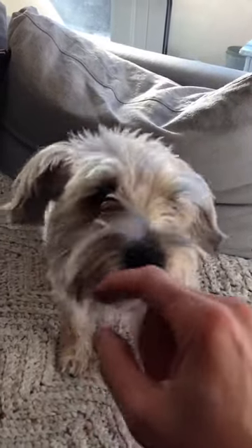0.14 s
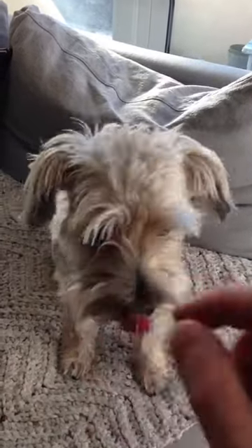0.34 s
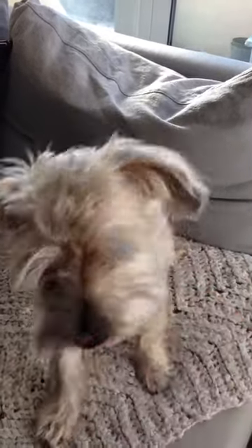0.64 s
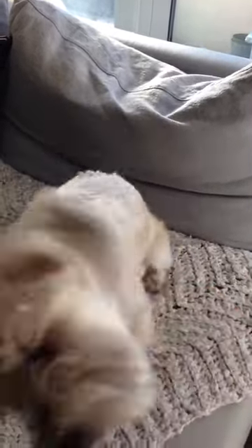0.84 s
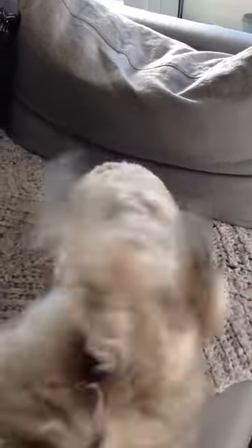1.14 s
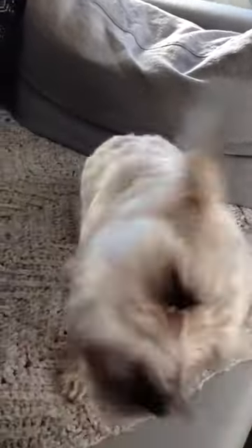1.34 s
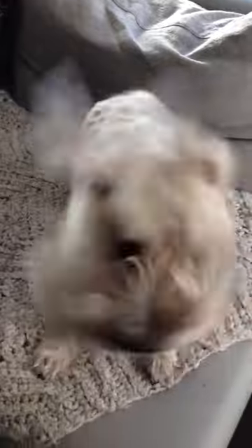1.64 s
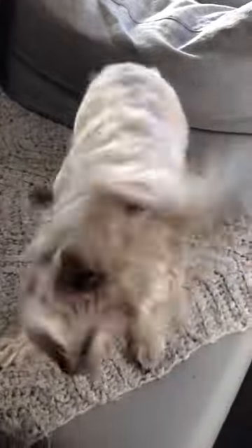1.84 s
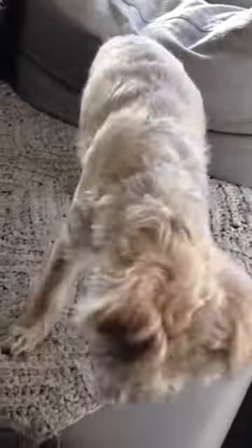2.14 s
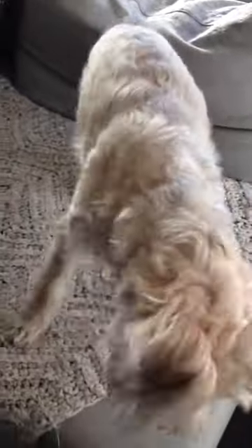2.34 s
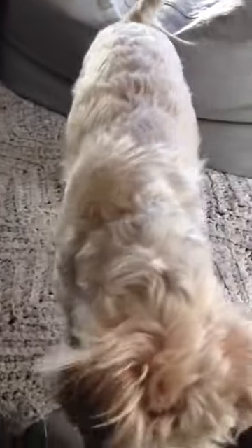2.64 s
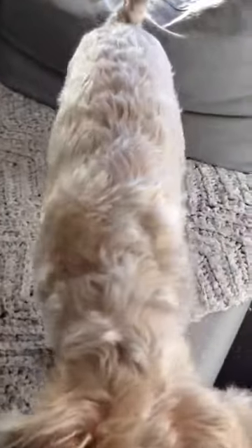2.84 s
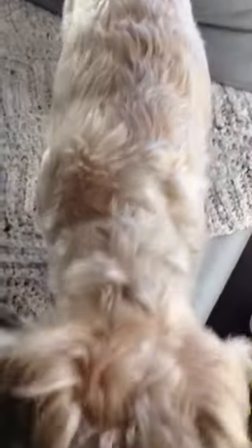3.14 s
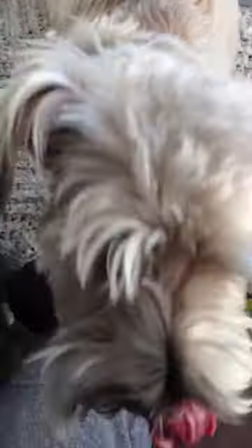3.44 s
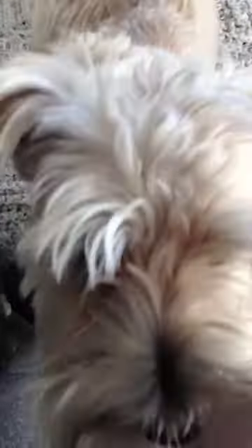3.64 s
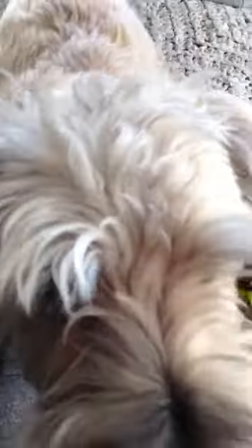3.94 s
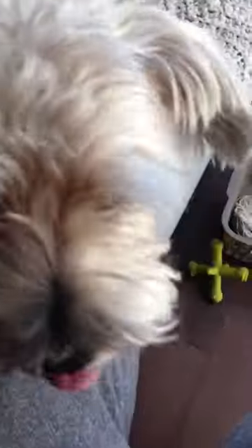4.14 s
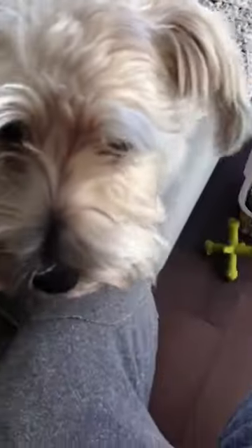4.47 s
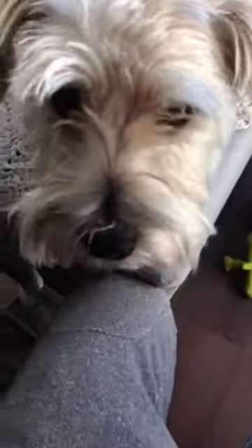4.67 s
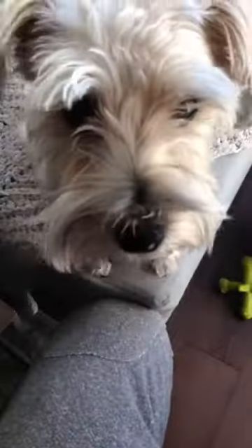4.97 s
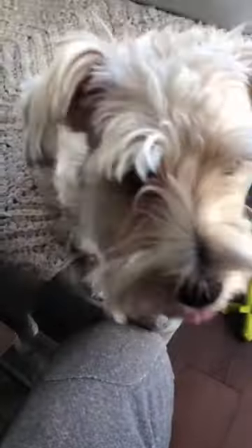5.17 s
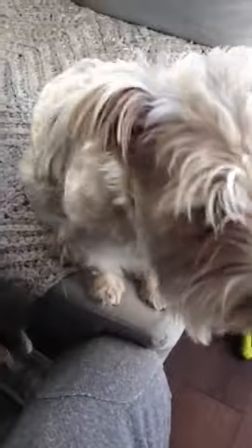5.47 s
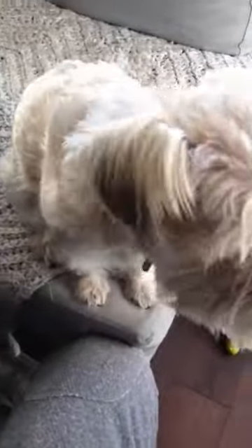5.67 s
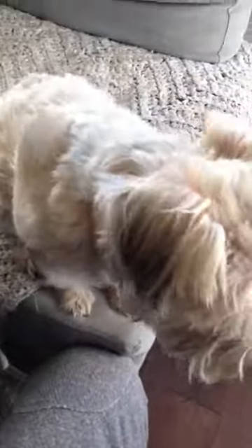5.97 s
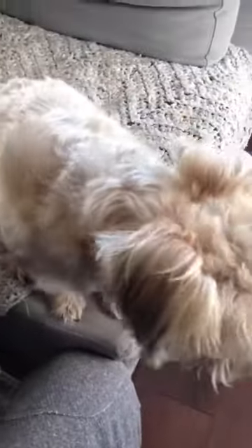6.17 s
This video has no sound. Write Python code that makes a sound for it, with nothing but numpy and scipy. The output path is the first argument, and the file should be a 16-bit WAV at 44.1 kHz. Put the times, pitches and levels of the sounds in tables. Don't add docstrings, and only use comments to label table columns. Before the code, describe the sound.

Close, dry indoor sound from one small microphone about a metre from a dog. Light claw taps lead into a one-second head shake with accelerating leathery ear flaps, rustling fur and hard, high clinks of collar tags with a thin metallic rattle. A few fading jingles follow, then soft fur rustle, wet licks and ticking claws. Finally two tiny airy squeaks, one sinking, one rising and tearing, then near silence.

```python
import sys
import numpy as np
from scipy import signal
from scipy.fft import rfft, irfft, next_fast_len
from scipy.io import wavfile
from scipy.ndimage import map_coordinates

SR = 44100
rng = np.random.default_rng(int(sys.argv[2]) if len(sys.argv) > 2 else 0)


def unload_audio(sound):
    columns = np.transpose(np.atleast_2d(sound))
    steps = np.round(np.clip(columns, -1, 1) * 32767)
    wavfile.write(sys.argv[1], SR, steps.astype(np.int16))


def boost(x):
    u = np.asarray(x, float) / 20
    return 10 ** u


N = 278271

# f/Hz, density/dB
FLOOR_SPECTRUM = [(15, -51.5), (25, -36.5), (92, -19), (161, 2.5), (210, -6), (335, -4), (430, -10),
                  (900, -19), (2000, -20.5), (14500, -20.5), (15200, -23.5), (15600, -40.5), (16500, -52),
                  (17000, -120)]
FLOOR_DB = -65.37
# f/Hz, gain/dB
MIC_RESPONSE = [(20, -49.5), (60, -22.5), (110, -7), (200, -2), (15200, 0.5), (15600, -23.5), (22050, -42)]
# f/Hz, t60/s
ROOM_T60 = [(200, 0.36), (1500, 0.32), (4000, 0.37), (8000, 0.26), (14000, 0.16)]

# t/s, rustle level/dB
FUR_MOTION = [(0.0, -75.5), (0.144, -70), (0.46, -66), (0.8, -72), (0.95, -71), (1.444, -61.5), (1.62, -55),
              (1.894, -56), (2.192, -68.5), (2.84, -75), (3.56, -69), (4.02, -67.5), (4.5, -65),
              (5.01, -73.5), (5.25, -70.5), (5.62, -75), (5.9, -78)]
# f/Hz, density/dB
COAT_SPECTRUM = [(88, -41.5), (150, 5), (508, -6), (660, -3.5), (1050, -5.5), (2410, -6), (2730, -6.5),
                 (6000, -11), (7800, -24.5), (13200, -120)]

# t/s, peak level/dB, hollow f/Hz
LICKS = [(0.579, -56, 2500), (3.384, -43.5, 816), (3.679, -46.5, 3100), (5.291, -39, 1430),
         (4.097, -55, 778), (4.153, -41, 1153), (4.162, -48.5, 1130), (4.173, -46, 1274),
         (4.189, -52, 1400), (4.384, -50, 1130), (4.482, -39, 1175), (5.044, -49, 2450), (5.124, -48, 950),
         (5.392, -42.5, 1377)]
# t/s, peak level/dB, hollow f/Hz
CLAWS = [(0.093, -58, 2600), (0.17, -43, 1370), (0.309, -53, 1420), (0.964, -55, 2000),
         (2.445, -51.5, 3800), (2.665, -48.5, 2230), (3.36, -60.5, 4600), (3.547, -54, 4960),
         (3.718, -49.5, 2590), (4.337, -48.5, 2670), (4.442, -55, 1670), (4.589, -49.5, 1010),
         (4.614, -46, 2157), (4.774, -54, 686), (5.042, -49, 1680), (5.084, -50.5, 3250),
         (5.197, -55, 3510), (5.328, -50, 1770), (5.397, -47, 3700), (5.417, -45.5, 4100),
         (5.443, -47, 3470)]
CLAW_T60_S, CLAW_CLICK_DB = 0.0061, 1.5
LICK_T60_S, LICK_CLICK_DB = 0.012, -10
# f/Hz, density/dB
CLICK_SPECTRUM = [(500, -12), (1500, -7), (3500, 2), (6000, 0.0), (9000, -21)]

# t/s, pitch f/Hz, tone level/dB, tightness as brightness/(dB/octave)
SQUEAKS = [
    [(5.913, 1560, -34, 4), (5.919, 1650, -32, 7), (5.933, 1689, -28, 0.5), (5.949, 1640, -30, -2),
     (5.963, 1446, -32.5, -2), (5.979, 1181, -39.5, -3), (5.989, 1140, -37.5, -5), (6.012, 995, -43, -7.5),
     (6.022, 950, -65, -4)],
    [(6.081, 1118, -36.5, 8), (6.088, 1289, -33, 9), (6.097, 1438, -28, 8.5), (6.118, 1604, -24, 0),
     (6.130, 1738, -19.5, -2.5), (6.137, 1429, -24, -3.5), (6.143, 1100, -27, -6), (6.149, 956, -33.5, -3),
     (6.16, 730, -44, -2)],
]
# f/Hz, gain/dB
CAVITIES = [
    [(900, -25), (1600, -3.5), (2200, -4.5), (3300, -5), (5000, -8), (6700, -1), (8400, -5.5), (10000, 1.5),
     (12000, -6), (15000, -9)],
    [(900, -4.5), (1600, 5), (2100, -4.5), (3300, -1.5), (5000, -9.5), (6700, -8.5), (8400, -13.5),
     (10000, -13.5), (12000, -35), (15000, -22)],
]
# initial looseness/(0-1), gives way t/s, loosening/(1/s), puff level/dB, hiss re tone/dB
SEALS = [
    (.05, 5.95, 7, -48, -12.5),
    (.05, 6.115, 35.8, -31, -12),
]
# f/Hz, density/dB
HISS_SPECTRUM = [(500, -49), (1500, -22), (3500, -5.5), (7000, 2), (11000, 4.5), (15500, -11)]
PUFF_T60_S, LOOSEST = .03, 0.91
EDGE_S, EDGE_DB, EDGE_HZ, EDGE_RISE_S, EDGE_FALL_S = 6.13, -22.5, 2060, 0.0028, .0048

# t/s, peak level/dB, hair re peak/dB, hollow f/Hz
EAR_SLAPS = [(1.069, -45, -17, 410), (1.083, -53, 0, 401), (1.177, -39.5, -3, 1100),
             (1.258, -35.5, -16, 710), (1.351, -34, -1.5, 417), (1.411, -48, -19, 1880),
             (1.432, -30.5, -5, 1380), (1.519, -27.5, -16.5, 1270), (1.531, -40, 5.5, 1307),
             (1.599, -25.5, -5, 624), (1.68, -25.5, -18.5, 1330), (1.757, -26, 0, 674),
             (1.836, -25.5, 5, 620), (1.914, -27, 3, 1300), (2.135, -50, -18, 643), (2.23, -57, -11, 646)]
# t/s, level/dB
AIR_PUSHES = [(1.069, -54), (1.18, -50), (1.258, -52), (1.351, -50.5), (1.525, -52), (1.679, -39),
              (1.756, -50.5), (1.836, -41.5), (1.914, -48.5), (2.135, -53.5), (2.23, -54.5)]
# f/Hz, gain/dB
PAT_SPECTRUM = [(200, -7.5), (600, -0.5), (1300, -1.5), (2500, -4), (4000, -19), (8000, -37.5),
                (14000, -70.5)]
# f/Hz, density/dB
BRUSH_SPECTRUM = [(1500, -12.5), (3500, -4.5), (6000, -12.5), (9000, -23)]

# t/s, crack level/dB, low mode level/dB, high mode level/dB, free ring/s
HARD_CLINKS = [
    (1.609, -46.5, -49, -42, .02),
    (1.6240, -27, -50, -39, .018),
    (1.6327, -11.5, -17.5, -17.5, .002),
    (1.6345, -18, -19.5, -18.5, .015),
    (1.7904, -11, -21, -10, .008),
    (1.9321, -12.5, -20, -48.5, .0083),
    (1.9389, -12, -45, -22, .003),
]
# t/s, crack level/dB, low mode level/dB, high mode level/dB
LIGHT_CLINKS = [(1.05, -62, -67, -52.5), (1.0819, -57, -64, -61), (1.1194, -50, -70, -72),
                (1.3134, -50, -61, -49.5), (1.4174, -49, -65, -66), (1.4534, -46, -56, -56),
                (1.4814, -55, -64, -47.5), (1.4955, -36, -43, -41.5), (1.5174, -36, -52, -49.5),
                (1.5549, -25.5, -46.5, -70.5), (1.699, -32.5, -63, -44), (1.7215, -39, -51, -40.5),
                (1.8114, -48.5, -42, -31.5), (1.8514, -34, -52, -42), (1.8731, -22, -56, -61.5),
                (1.9504, -42, -45, -43.5), (2.0438, -61, -66, -50), (2.0772, -30.5, -52, -37),
                (2.0981, -37, -42.5, -34.5), (2.2024, -48, -54, -43), (2.3014, -53, -63, -66),
                (2.3989, -51, -56, -52), (2.4404, -48, -61.5, -54), (2.5594, -61.5, -65, -56)]
# t/s, ring level/dB
SECOND_TAG = [
    (1.313, -49),
    (1.5537, -41.5),
    (1.6092, -53),
    (2.0786, -39.5),
    (2.099, -49),
    (2.205, -45.5),
    (2.3004, -58),
    (2.3999, -59),
]
# f/Hz, level/dB, t60/s
LOW_MODES = [(7133, -2.5, 0.19), (7600, -25, 0.057), (8750, -28, 0.05016)]
# f/Hz, level/dB, t60/s
HIGH_MODES = [(11910, -1.5, .24), (12500, -13.5, .04), (12730, -22, .05), (14600, -29.5, .03)]
# f/Hz, level/dB, t60/s
SECOND_MODES = [(6800, 7.5, .2), (9220, -20.5, 0.11)]
# f/Hz, gain/dB
CRACK_SPECTRUM = [(800, -40), (2000, -2.5), (4000, 4), (8000, 2.5), (12000, 2), (16000, -24.5)]
# f/Hz, gain/dB
TAP_SPECTRUM = [(800, -29.5), (2000, -10.5), (4000, 1), (6500, -3), (9000, -10), (16000, -25.5)]
# f/Hz, density/dB
LINK_SPECTRUM = [(2500, -30), (5000, -2), (8000, 0), (12000, 0.5), (15500, -5.5)]
HIGH_FREE = .45
LIGHT_FREE_S, SECOND_FREE_S = .021, .019
RATTLE_S, RATTLE_DB, RATTLE_RISE_DB_S, RATTLE_FALL_DB_S = 1.82, -57.5, 27, 23


def unit(x):
    return x / np.sqrt(np.mean(x ** 2) + 1e-20)


def along(points, hz):
    f, v = np.transpose(points)
    return np.interp(np.log(hz + 1), np.log(f + 1), v)


def wobble(rate, size):
    knots = rng.standard_normal(int(size * rate / SR) + 4)
    return map_coordinates(knots, [np.arange(size) * rate / SR])


def noise(spectrum, size):
    m = next_fast_len(size + 8192)
    gain = boost(along(spectrum, np.fft.rfftfreq(m, 1 / SR)))
    return unit(irfft(rfft(rng.standard_normal(m)) * gain, m)[:size])


def impulse(spectrum):
    cepstrum = irfft(np.log(boost(along(spectrum, np.fft.rfftfreq(2048, 1 / SR)))))
    causal = np.r_[cepstrum[0], 2 * cepstrum[1:1024], np.zeros(1024)]
    h = irfft(np.exp(rfft(causal)))[:1024]
    return h / np.abs(h).max()


def add(track, s, x):
    part = track[round(s * SR):][:len(x)]
    part += x[:len(part)]


def room(x):
    out, step = np.zeros(N), SR // 8
    for i in range(0, N, step):
        hz, t, z = signal.stft(rng.standard_normal(SR // 2), SR, nperseg=256)
        decay = boost(-60 * t / along(ROOM_T60, hz)[:, None])
        tail = signal.istft(z * decay, SR, nperseg=256)[1]
        add(out, i / SR + .004, signal.fftconvolve(x[i:i + step], tail / np.linalg.norm(tail)))
    return out


def fur():
    s, db = np.transpose(FUR_MOTION)
    grain = boost(2.17 * wobble(400, N) + 2.33 * wobble(40, N))
    return boost(np.interp(np.arange(N) / SR, s, db)) * unit(grain * noise(COAT_SPECTRUM, N))


def licks_and_claws():
    out, t = np.zeros(N), np.arange(SR // 16) / SR
    onset = 1 - np.exp(-t / 0.00034)
    for rows, t60, click_db in ((LICKS, LICK_T60_S, LICK_CLICK_DB), (CLAWS, CLAW_T60_S, CLAW_CLICK_DB)):
        for s, db, hz in rows:
            tone = np.sin(2 * np.pi * hz * t + 1.2 * wobble(402, len(t)))
            hollow = tone * boost(-60 * t / t60 + 3.3 * wobble(480, len(t)))
            click = noise(CLICK_SPECTRUM, len(t)) * boost(-60 * t / 0.0034)
            add(out, s, boost(db + 3.5) * onset * (hollow + boost(click_db) * click))
    return out


def squeaks():
    out = np.zeros(N)
    for rows, cavity, (firm, give_s, rate, puff_db, hiss_db) in zip(SQUEAKS, CAVITIES, SEALS):
        s, *cols = np.transpose(rows)
        t = np.arange(s[0], s[-1], 1 / SR)
        hz, tone_db, bright_db = [np.interp(t, s, c) for c in cols]
        loose = np.clip(firm + rate * np.maximum(t - give_s, 0), 0, LOOSEST)
        frayed_hz = hz * (1 + 0.149 * loose ** 1.6 * wobble(700, len(t)))
        turn = 2 * np.pi * np.cumsum(frayed_hz) / SR
        tone, power = 0, 0
        for k in range(1, 15):
            softening_db = 30 * np.minimum(loose, .25) * np.log2(max(k / 2, 1))
            gain_db = along(cavity, k * hz) + bright_db * np.log2(k) - softening_db
            gain = boost(gain_db) * (k * hz < 15500)
            tone = tone + gain * np.sin(k * turn + .35 * k * k)
            power = power + gain ** 2 / 2
        tone = tone / np.sqrt(power)
        tone = tone * (1 + 0.4 * loose ** 2 * np.cos(turn / 2)) * (1 + 0.34 * loose * wobble(695, len(t)))
        torn = noise([(250, -20), (500, -5)] + cavity, len(t))
        tone = tone + 0.75 * loose ** 2 * torn
        leak = boost(tone_db + hiss_db) + boost(puff_db - 60 * (t - s[0]) / PUFF_T60_S)
        hiss = noise(HISS_SPECTRUM, len(t)) * (1 + 0.53 * np.cos(turn))
        onset = 1 - np.exp(-(t - s[0]) / 0.0003)
        add(out, s[0], (boost(tone_db) * tone + leak * hiss) * onset)
    return out


def slit_edge():
    t = np.arange(N) / SR
    turn = 2 * np.pi * EDGE_HZ * t + 1.5 * wobble(600, N)
    swell_s = np.where(t < EDGE_S, EDGE_RISE_S, EDGE_FALL_S)
    return boost(EDGE_DB - ((t - EDGE_S) / swell_s) ** 2) * np.sin(turn)


def ears():
    out, pat, t = np.zeros(N), impulse(PAT_SPECTRUM), np.arange(SR // 16) / SR
    pat = np.r_[pat, np.zeros(len(t) - len(pat))]
    for s, db, hair_db, hz in EAR_SLAPS:
        pats = rng.standard_normal(len(t)) ** 3 * boost(-60 * t / .02) * (1 - np.exp(-t / .0015))
        cup = pat + .32 * np.sin(2 * np.pi * hz * t) * boost(-60 * t / .008)
        slap = signal.fftconvolve(pats, cup)[:len(t)]
        brush = noise(BRUSH_SPECTRUM, len(t)) * boost(-60 * t / 0.03) * (1 - np.exp(-t / .001))
        add(out, s, boost(db + 1.5) * (slap / np.abs(slap).max() + boost(hair_db - 9.5) * brush))
    push = np.sin(2 * np.pi * 190 * t) * boost(-60 * t / 0.026) * (1 - np.exp(-t / 0.00098))
    for s, db in AIR_PUSHES:
        add(out, s, boost(db + 12) * push)
    return out


def rattle():
    late = np.arange(N) / SR - RATTLE_S
    level = boost(RATTLE_DB + np.minimum(RATTLE_RISE_DB_S * late, -RATTLE_FALL_DB_S * late))
    spikes = boost(3.2 * wobble(300, N) + 2.506 * wobble(50, N))
    return level * unit(spikes * noise(LINK_SPECTRUM, N))


def ring(modes, free_s, choke_db):
    t = np.arange(SR // 5) / SR
    choke = boost(-np.minimum(60 * np.maximum(t - free_s, 0) / 0.024, choke_db))
    beam = boost(4.58 * wobble(260, len(t)) * np.minimum(t / .008, 1))
    swing = 0.8 * wobble(260, len(t))
    tones = np.zeros(len(t))
    for hz, db, t60 in modes:
        strike_db = db + rng.normal(0, 2) * (db < -5)
        tones += boost(strike_db - 60 * t / t60) * np.sin(2 * np.pi * hz * t + swing)
    return tones * choke * beam * (1 - np.exp(-t / 0.00025))


def tags():
    out, n = np.zeros(N), np.arange(2000)
    hard = [(*row, HIGH_FREE * row[-1]) for row in HARD_CLINKS]
    light = [(*row, LIGHT_FREE_S, LIGHT_FREE_S) for row in LIGHT_CLINKS]
    kinds = ((hard, impulse(CRACK_SPECTRUM), .1, 26), (light, impulse(TAP_SPECTRUM), 3, 7))
    for rows, crack, lift_db, choke_db in kinds:
        for s, db, low_db, high_db, low_free_s, high_free_s in rows:
            chatter = np.r_[1, .15 * rng.standard_normal(200) * boost(-.3 * n[:200])]
            add(out, s, boost(db + lift_db) * np.convolve(chatter, crack))
            sizzle = noise(LINK_SPECTRUM, 2000) * boost(-.15 * n)
            add(out, s, boost(max(low_db, high_db) - 7.5) * sizzle)
            add(out, s, boost(low_db + 2.0) * ring(LOW_MODES, low_free_s, choke_db))
            add(out, s, boost(high_db) * ring(HIGH_MODES, high_free_s, choke_db))
    for s, db in SECOND_TAG:
        add(out, s, boost(db - 11) * ring(SECOND_MODES, SECOND_FREE_S, 12))
    return out


def scene():
    metal, head, small, near = tags(), ears(), licks_and_claws(), squeaks() + slit_edge()
    wet = room(boost(-13) * metal + boost(-10.0) * head + boost(-15) * small + boost(-16) * near)
    return (metal + rattle() + head + small + near + wet + fur())[None]


def top_cut(x):
    return signal.sosfilt(signal.butter(12, 16200, fs=SR, output="sos"), x)


def record(dry):
    heard = irfft(rfft(dry) * boost(along(MIC_RESPONSE, np.fft.rfftfreq(N, 1 / SR))), N)
    mix = heard + boost(FLOOR_DB) * noise(FLOOR_SPECTRUM, N)
    return top_cut(mix)


dry = scene()
out = record(dry)
unload_audio(out)
```